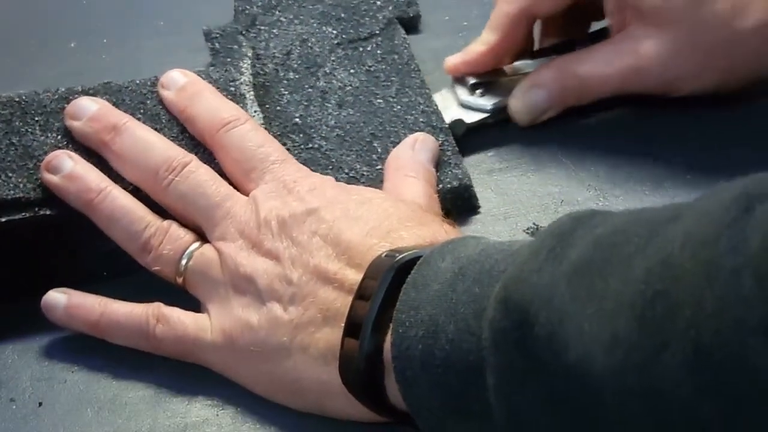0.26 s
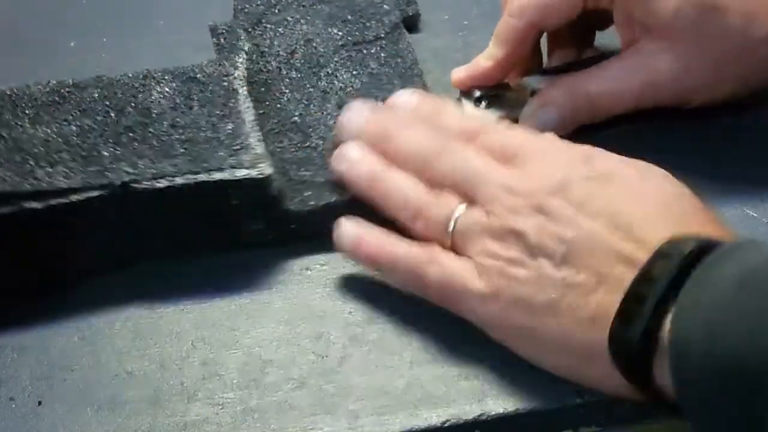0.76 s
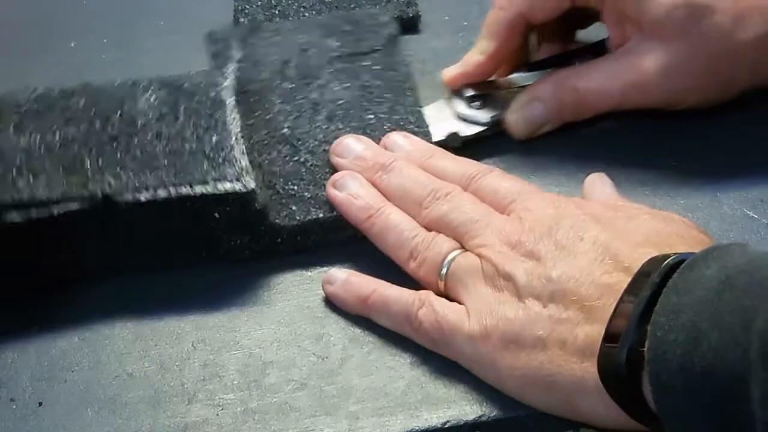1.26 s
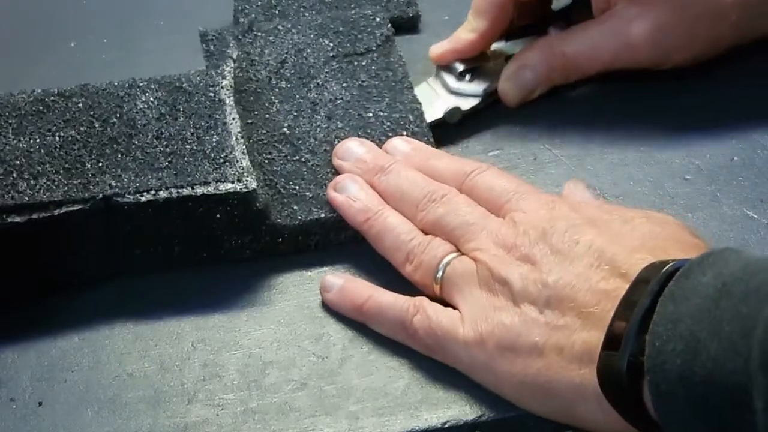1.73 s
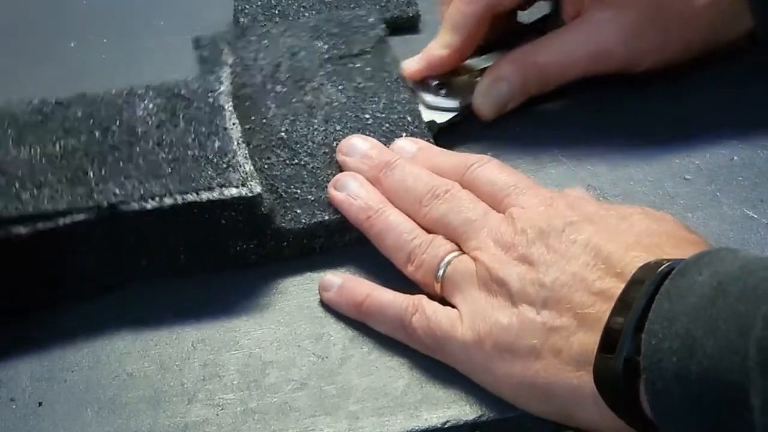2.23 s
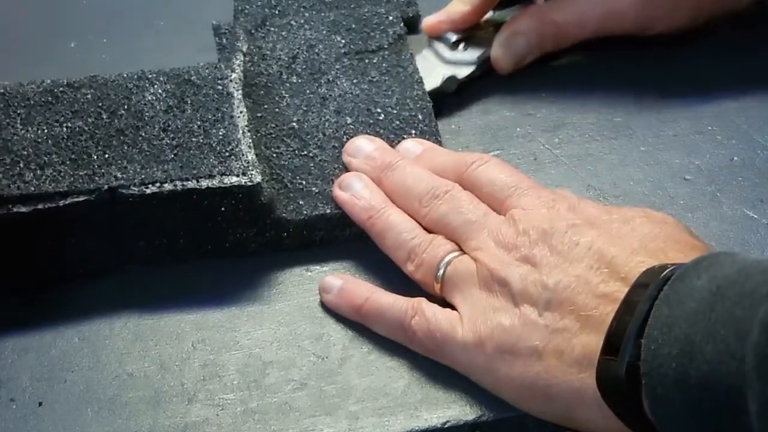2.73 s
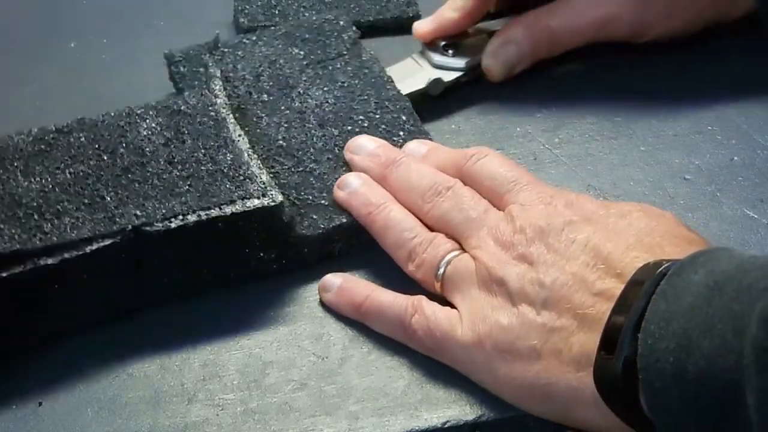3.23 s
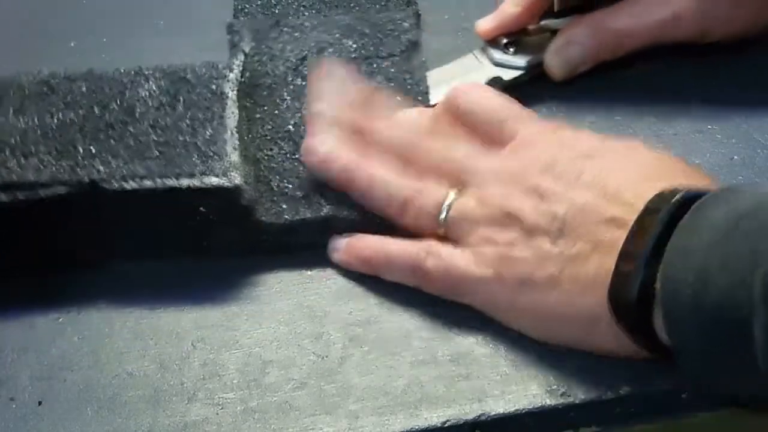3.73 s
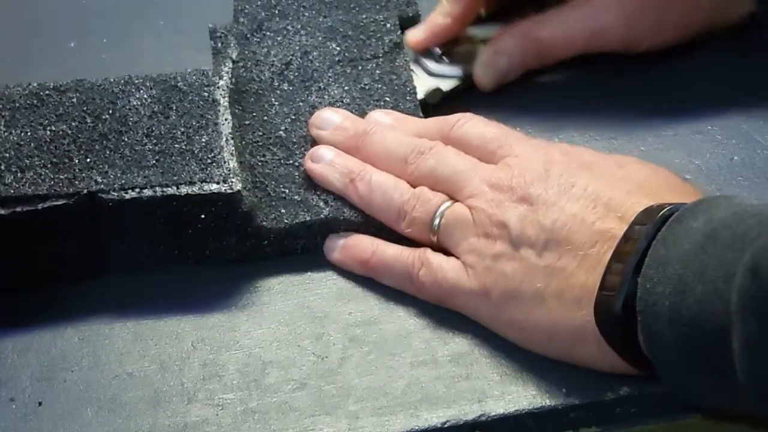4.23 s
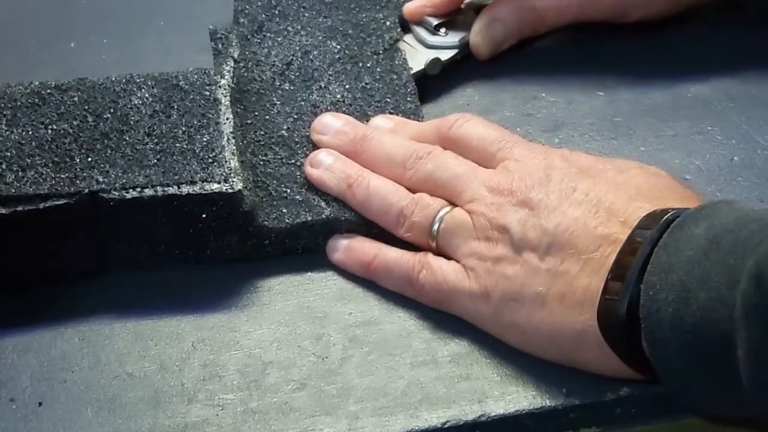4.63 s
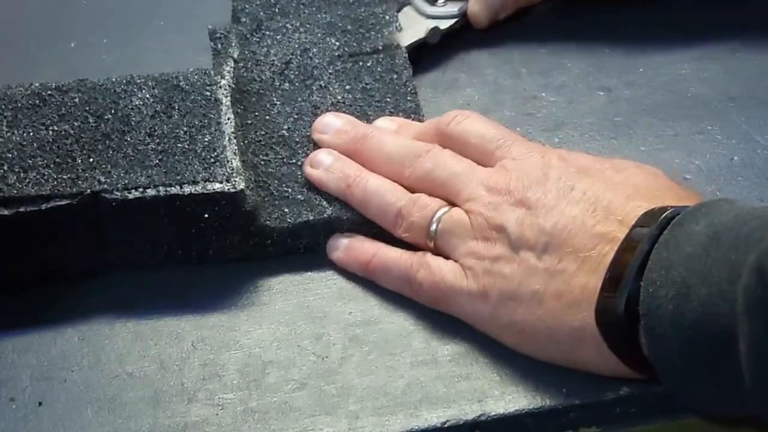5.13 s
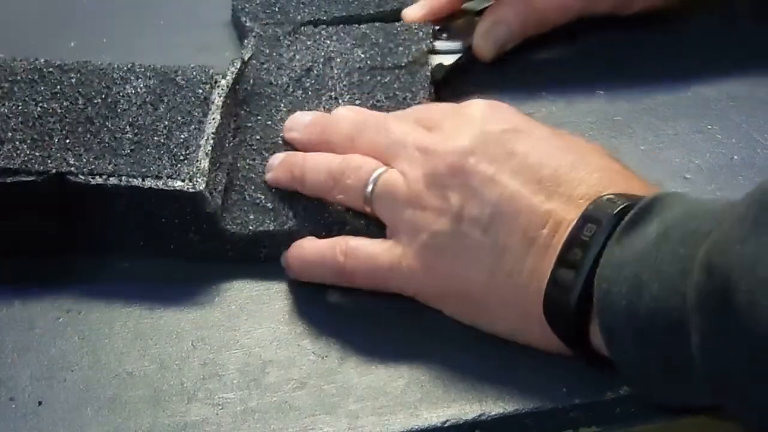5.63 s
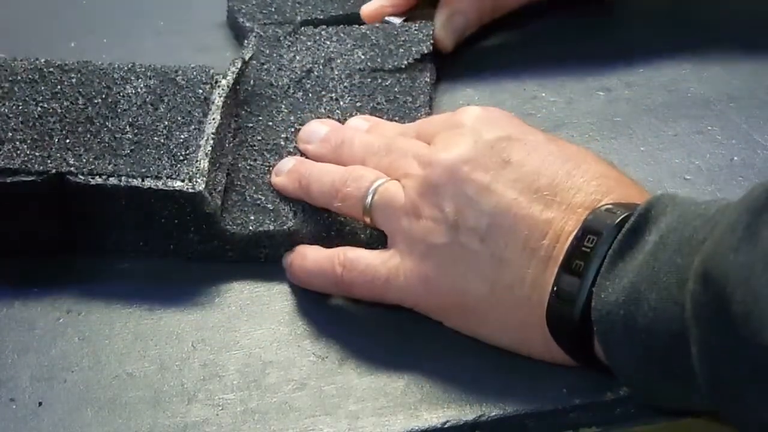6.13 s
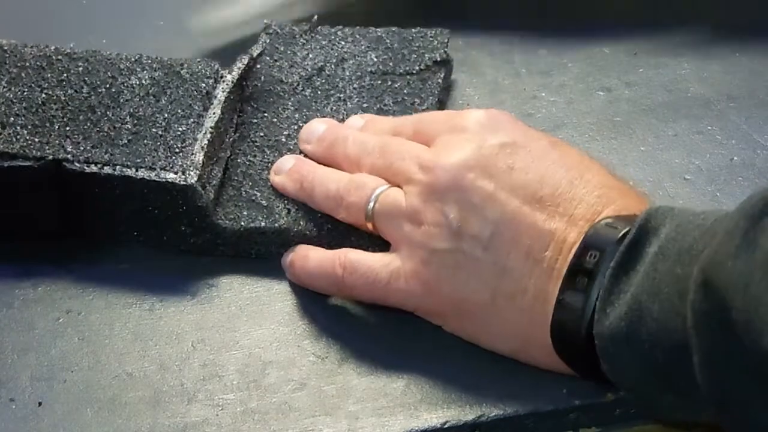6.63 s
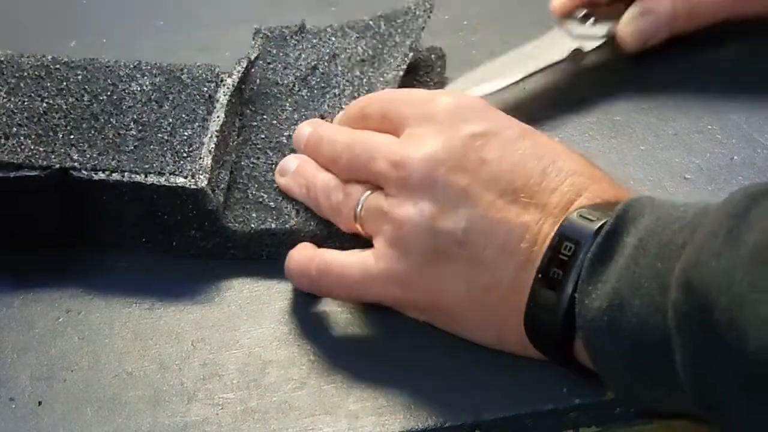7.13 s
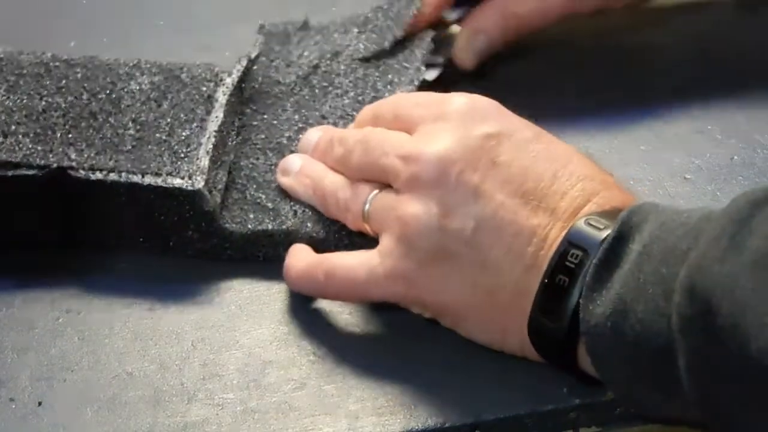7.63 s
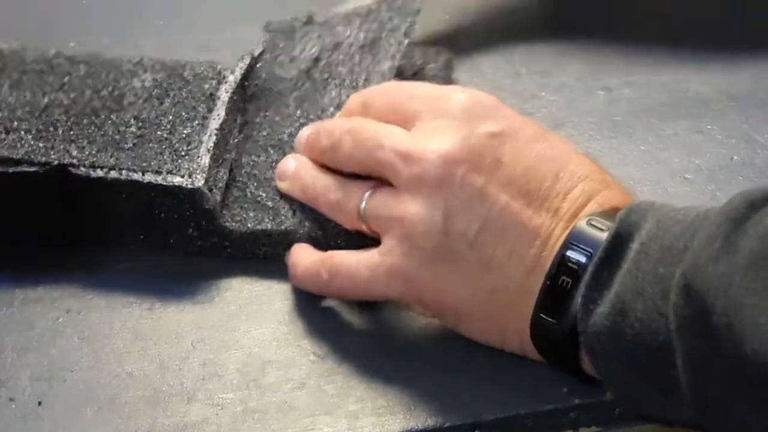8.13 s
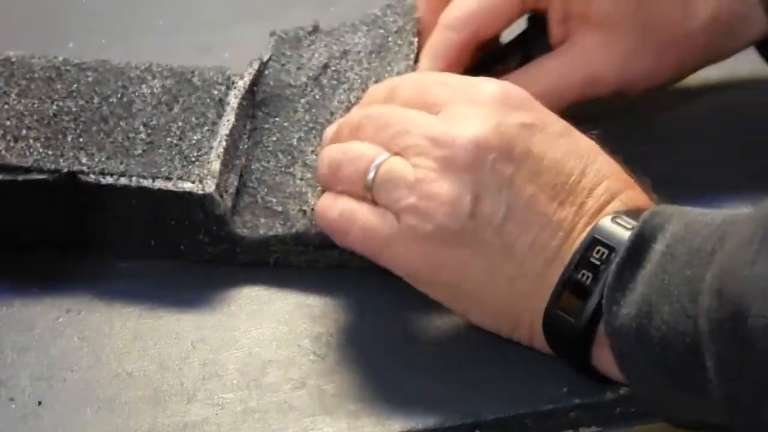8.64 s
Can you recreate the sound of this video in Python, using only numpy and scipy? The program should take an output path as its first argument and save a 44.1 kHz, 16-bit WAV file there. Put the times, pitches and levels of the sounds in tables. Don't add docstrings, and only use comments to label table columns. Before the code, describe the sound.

Dry, gritty tearing of foam under a blade, very near the microphone. Uneven strokes swell and fade with ticks and tiny snaps between them; sudden stick-slip rasps jump out and thump the slab softly. Late on, the knife knocks the hard bench in a tight cluster of bounces, then shorter strokes resume. Short bright room echoes follow, over faint hiss and a barely audible climbing motor hum.

```python
import sys
import numpy as np
from scipy import signal
from scipy.fft import rfft, irfft, next_fast_len
from scipy.io import wavfile
from scipy.ndimage import uniform_filter1d

SR = 44100
rng = np.random.default_rng(int(sys.argv[2]) if len(sys.argv) > 2 else 0)


def bounce(signal):
    frames = np.transpose(np.atleast_2d(signal))
    limited = np.clip(frames, -1, 1)
    pcm = np.round(limited * 32767).astype(np.int16)
    wavfile.write(sys.argv[1], SR, pcm)


def amplitude_ratio(level_db):
    exponent = np.asarray(level_db, float) / 20
    return 10 ** exponent


N = 391166

# pitch_hz, level_db
FOAM = [(35, -52), (60, -35), (142, -32), (217, -23.5), (427, -17.5), (515, -10), (635, -11.5), (840, -5.5),
        (901, -6.5), (1170, -8), (1820, -5), (2770, -5), (6270, -6.5), (8290, -2.5), (16000, -43.5)]
# pitch_hz, width_hz, level_db
SLAB = [(431, 21, -1), (502, 114, -1.5), (631, 120, -1), (1324, 680, -1)]
# low_hz, high_hz
VOICE_HZ = [(90, 250), (300, 750), (750, 1600), (1600, 5000), (5000, 12000)]
SPREAD_DB = -2
BAND_DRIFT_DB, BAND_FLICKER_DB, FLICKER_DB = 0.6, 1.2, 0.9


def knife():
    tear = crackle(rate=5000, scatter_db=5.0, hiss=0.7)
    rings = 0
    for hz, width, db in SLAB:
        rings = rings + amplitude_ratio(db) * signal.lfilter(*signal.iirpeak(hz, hz / width, SR), tear)
    tear = colour(tear + rings, FOAM)
    spread = colour(crackle(rate=4900, scatter_db=5.0, hiss=0.76), FOAM)
    spread = colour(spread, ROOM_SIDE) * amplitude_ratio(SPREAD_DB)

    f, density = signal.welch(tear, SR, nperseg=2 ** 12)
    at_rest = [density[(f > lo) & (f < hi)].sum() * f[1] for lo, hi in VOICE_HZ]
    log_gain = np.log(stroke_power() / np.c_[at_rest]) / 2
    centres = np.log(VOICE_HZ).mean(axis=1)
    out = 0
    for hz, band in bands(np.array([tear, spread])):
        share = [np.interp(np.log(hz), centres, one) for one in np.eye(len(VOICE_HZ))]
        change_db = BAND_DRIFT_DB * walk(9) + BAND_FLICKER_DB * walk(45)
        out = out + band * np.exp(share @ log_gain) * amplitude_ratio(change_db)
    return out * amplitude_ratio(FLICKER_DB * walk(35))


def crackle(rate, scatter_db, hiss):
    size_db = np.minimum(scatter_db * rng.exponential(size=N), 5)
    happens = rng.random(N) < rate / SR
    bursts = happens * amplitude_ratio(size_db) * rng.uniform(-1, 1, N)
    return unit(bursts) + hiss * rng.standard_normal(N)


BITE_MS, BITE_PER_LENGTH = 0.46, 0.076


def stroke_power():
    t = np.arange(N) / SR
    power = sawing_power()
    for at, gains, ms in slips() + snaps() + knocks() + thumps():
        i, length = int(at * SR), ms / 1000
        age = t[:min(int(5 * length * SR), N - i)]
        bite = BITE_MS / 1000 + BITE_PER_LENGTH * min(length, 0.012)
        shape = (1 - np.exp(-age / bite)) * np.exp(-(age / length) ** 2)
        power[:, i:i + len(age)] += np.outer(gains * amplitude_ratio(-11.0), shape) ** 2
    return power


# deepest_bite_s, rasp_db, swell_ms, fade_ms, weight_on_slab_db
STROKES = [(0.17, -40.5, 99, 356, 1.5), (0.632, -44.5, 118, 430, 0), (2.093, -34.5, 46, 97, 1),
           (2.292, -22.5, 22.4, 81, 0), (2.32, -29.5, 39, 152, 1.5), (3.23, -44, 56, 190, -10),
           (3.338, -41, 214, 115, 3.5), (3.733, -29, 38, 97, -1), (3.972, -28.5, 8.8, 23, 0),
           (4.003, -33, 22, 27, -2), (4.029, -27, 5.9, 18, -3.5), (4.034, -42, 160, 57, 3.5),
           (4.28, -37, 49, 74, 2.5), (4.764, -41.5, 83, 97, 3), (5.12, -27, 10.6, 145, -5),
           (5.46, -43, 156, 136, 1.5), (8.24, -53.5, 36, 170, 7), (5.742, -41.5, 83, 265, -6.5),
           (6.47, -50.5, 22, 170, 1), (6.842, -44.5, 8.1, 210, -9), (6.88, -31.5, 41, 130, -12),
           (6.934, -28.5, 67, 89, -1.5), (7.361, -49.5, 59, 92, 1.5), (8.61, -40.5, 37, 226, 4),
           (8.815, -42, 49, 260, 5),
           (0.0, -47.5, 59, 197, -1.5), (0.47, -51.5, 52, 60.6, -5), (0.955, -48.5, 21, 50, 2),
                 (1.456, -49, 21, 150, 2.5), (1.623, -50.5, 30, 237, 0.5), (1.585, -52, 20, 60, -10),
                 (2.03, -51.5, 110, 50, 1), (3.104, -46.5, 6.8, 90.5, -1), (3.459, -52.5, 15, 80, 2),
                 (3.531, -47, 41, 210, 1), (3.69, -51.5, 90, 50.3, -11), (3.92, -47, 21, 201, 6),
                 (4.7, -66, 12, 200, 0), (5.091, -48.5, 84, 30.2, 1), (6.336, -56, 5.4, 69.8, 0.5),
                 (6.45, -59, 140, 30, 2.5), (7.14, -48.5, 80, 109, -6), (7.305, -55.5, 29, 200, -6),
                 (7.55, -57, 63, 82.8, -1), (7.669, -53, 43, 170, 1.5), (8.042, -54, 62, 141, 8.5),
                 (8.322, -54, 290, 70.5, 5.5), (8.416, -49.5, 120, 89.5, 4.5), (8.55, -50.5, 150, 80, -1)]
# start_s, end_s, rasp_db, weight_on_slab_db
DRAGS = [(0.147, 0.35, -44, -2), (0.968, 1.18, -55, 2.5), (1.224, 1.465, -50.5, 2),
         (2.515, 2.577, -48.5, 3.5), (2.645, 2.841, -48.5, 2.5), (2.874, 3.004, -58.5, 1),
         (4.05, 4.214, -49, 3), (4.329, 4.467, -47.5, 3), (4.494, 4.616, -55.5, 3.5),
         (4.902, 5.008, -56.5, 3), (5.589, 5.92, -48, 0), (1.905, 1.95, -63, -5), (6.039, 6.16, -59.5, 5.5),
         (7.436, 7.65, -61, 3)]
DRAG_SWELL_MS, DRAG_FADE_MS, SAG_DB_PER_S = 24, 96, 12.5
REST_DB, FOOT = -81, 1.27
# thud_db, ring_db, fizz_db
STROKE_DB = (-18.5, -8, -4.5)
FADE_PACE = (.8, .85, .9, 1.01, 1.15)


def sawing_power():
    t = np.arange(N) / SR
    power = np.outer(voices(REST_DB, (-11, -3, 2), 0) ** 2, np.ones(N))
    sawing = [(at, at, db, swell, fade, weight) for at, db, swell, fade, weight in STROKES]
    sawing += [(start, end, db, DRAG_SWELL_MS, DRAG_FADE_MS, weight) for start, end, db, weight in DRAGS]
    for start, end, db, swell, fade, weight in sawing:
        swell, fade = max(swell, 6) / 1000, fade / 1000
        span = slice(max(int((start - 3 * swell) * SR), 0), int((end + 3 * fade) * SR))
        s = t[span]
        swell_db = 20 * (np.maximum(start - s, 0) / swell) ** FOOT
        sag_db = SAG_DB_PER_S * np.clip(s - start, 0, end - start)
        fade_db = 20 * np.maximum(s - end, 0) / fade + sag_db
        shape = amplitude_ratio(-swell_db - np.outer(FADE_PACE, fade_db))
        power[:, span] += (np.c_[voices(db - 2.5, STROKE_DB, weight)] * shape) ** 2
    return uniform_filter1d(power, size=256, axis=1) + 1e-14


# start_s, peak_db, weight_db, edge_db
TICKS = [(1.063, -36.5, 2, -6), (1.303, -33, 7, -12), (1.396, -42.5, 16.5, 6.5), (1.478, -41, 7, 8.5),
         (1.8332, -50.5, 6, 4.5), (1.9669, -49, 14, 8), (2.008, -42, 5, 11), (2.631, -34.5, 10, 0.5),
         (2.787, -43.5, 2, 10), (2.838, -48, 2, 11), (3.0944, -59.5, 1, -3), (3.4291, -39, -4, -2),
         (3.589, -32.5, 9, 5), (4.0544, -28, 2, -8), (4.4967, -31, 2, 0), (4.528, -36, 12, -2),
         (4.845, -49, -3, 8), (4.59, -36.5, -7, -8), (4.6912, -39, -3, 4), (5.768, -30.5, 5, 3.5),
         (5.806, -27.5, 2.5, -4), (6.3315, -54, 0, 11), (6.6827, -49.5, 8, -9), (6.8373, -44, -13, 11),
         (7.1767, -46.5, -6, 15), (7.668, -38, -4, -1), (8.161, -43, 3, 3.5), (8.2975, -35.5, 3, -10),
         (8.39, -43, 3, -2), (8.4093, -37, -3, -1), (3.479, -40, 0, -2), (1.366, -46, 0, 5),
         (1.131, -44.5, 11, 5), (8.5114, -44, 12, 0), (8.845, -32.5, 15, 3)]
CATCHES = [(0.9484, -33, -10, 2), (1.195, -29.5, 4, -1), (1.6261, -25.5, 3.5, -2.5), (2.269, -18, -8, -10),
           (2.277, -17, -6, -2), (3.458, -26.5, 1, -14), (3.5222, -25.5, -11, -5), (3.536, -24.5, 1.5, 0),
           (3.77, -21, -4, 3.5), (3.9315, -26, 6, 4), (5.1686, -16.5, 7, -11), (5.603, -30.5, 15.5, -1),
           (5.7285, -26.5, -1, 2), (5.724, -32, -4, -2), (5.735, -29, -4, -1), (5.793, -29.5, -5, 2),
           (6.461, -25, 0.5, -2.5), (8.584, -26, -9, 0), (8.5971, -15.5, 11.5, -1), (8.659, -27, 6, -7),
           (8.761, -29.5, 12.5, 3), (8.803, -19, 9.5, -20), (8.815, -25.5, -1, 7)]
TICK_MS, CATCH_MS = 13.8, 10.8
# start_s, peak_db, weight_db, edge_db, length_ms
RIPS = [(2.0433, -19, 4.5, 3, 23), (2.075, -25.5, 8, 1.5, 23), (2.287, -19, 5, -12, 8.2),
        (2.3194, -21, 8, -1, 20), (2.915, -41, 5, 8.5, 22), (3.713, -21, -2, 2, 36),
        (3.9076, -25.5, 4, 1.5, 11), (4.2625, -25.5, -5, -1, 14), (4.2824, -29, 6, -4, 29),
        (5.112, -12, 7.5, 1.5, 25), (5.138, -17, 7.5, 0.5, 24.6), (5.586, -26.5, 5.5, 0.5, 23),
        (8.225, -46, 12, 0, 48), (8.3184, -45, 18, 11, 11.4)]
# thud_db, ring_db, fizz_db
SLIP_DB = (-23.5, -18.5, -5)


def slips():
    events = [(*tick, TICK_MS) for tick in TICKS]
    events += [(*catch, CATCH_MS) for catch in CATCHES]
    events += RIPS
    return [(at, voices(db, SLIP_DB, weight, edge), ms) for at, db, weight, edge, ms in events]


# start_s, peak_db
SNAPS = [
    (2.0397, -22),
    (2.073, -16),
    (2.2605, -29),
    (4.285, -33),
    (4.691, -42),
    (5.1125, -13),
    (7.79, -20.5),
    (8.1645, -44),
]
SNAP_MS, SNAP_EDGE_DB = 2.6, -1


def snaps():
    return [(at, voices(db, SLIP_DB, 0, SNAP_EDGE_DB), SNAP_MS) for at, db in SNAPS]


# start_s, peak_db, weight_db, length_ms
KNOCKS = [
    (7.7587, -10, -8.5, 17.8),
    (7.7875, -14.5, -5, 29),
    (7.8, -18, 1.5, 27),
    (7.813, -28, 2, 8.9),
    (7.829, -28, 1, 9),
    (7.842, -22.5, 0.5, 18),
    (7.885, -39, 0, 22),
    (7.864, -33.5, 4, 43),
    (7.92, -40.5, 0.5, 50),
]
# thud_db, ring_db, fizz_db
KNOCK_DB = (1.5, 4, -18.5)
KNOCK_RASP_DB = 2.5


def knocks():
    return [(at, voices(db, KNOCK_DB, weight, rasp_db=KNOCK_RASP_DB), ms) for at, db, weight, ms in KNOCKS]


# start_s, peak_db, length_ms
THUMPS = [(1.628, -50, 47), (2.06, -52, 69), (2.29, -48, 47), (2.8, -62, 56), (3.72, -56, 50),
          (5.115, -60, 40), (5.59, -61, 30), (6.92, -51, 110), (8.1, -60, 410), (8.6, -52, 44),
          (8.76, -63, 60), (2.4, -52, 60), (3.76, -56, 45)]
# thud_db, ring_db, fizz_db
THUMP_DB = (-5.5, -20, -26)
THUMP_BOOM_DB, THUMP_RASP_DB = 2.5, -15


def thumps():
    return [(at, voices(db, THUMP_DB, 0, 0, THUMP_BOOM_DB, THUMP_RASP_DB), ms) for at, db, ms in THUMPS]


# thud_db, ring_db, fizz_db
PER_WEIGHT = (1, 1.1, 0.013)
BOOM_DB = -18.5


def voices(db, base_db, weight_db, edge_db=0, boom_db=BOOM_DB, rasp_db=0):
    thud, ring, fizz = np.array(base_db) + weight_db * np.array(PER_WEIGHT)
    return amplitude_ratio(db + np.array([thud + boom_db, thud, ring, rasp_db, fizz + edge_db]))


# start_s, end_s, pitch_hz, level_db
POCKET = [(3.715, 3.795, 510, 8), (3.99, 4.188, 1240, 8), (5.108, 5.33, 1275, 11), (5.74, 5.825, 1300, 11),
          (3.6, 3.9, 925, 2), (6.892, 6.994, 1390, 0.5), (2.79, 2.87, 452, 10), (6.478, 6.598, 1310, 1),
          (5.55, 5.85, 370, 0), (3.6, 4.0, 500, 2), (8.587, 8, 435, 3)]
# start_s, end_s, pitch_hz, level_db
GAPE = [(0.0, 0.05, 2460, 2), (0.95, 0.965, 2920, -5), (0.95, 1.02, 2700, -16), (1.39, 1.44, 1600, -14),
        (2.04, 2.18, 1930, -1), (2.07, 2.12, 3980, -0.5), (2.275, 2.36, 2840, -1), (2.28, 2.36, 1100, -1.5),
        (2.5, 2.78, 2000, -9), (3.26, 3.4, 2180, -5), (3.905, 3.99, 3880, 4), (4.0, 4.05, 4230, 0),
        (4.26, 4.46, 2200, 0), (4.74, 4.86, 1890, -4), (5.113, 5.135, 2930, -7), (5.14, 5.34, 1290, -3),
        (5.59, 5.62, 4300, 1), (1.24, 1.32, 3000, -4), (3.715, 3.8, 2790, -8.5), (3.72, 3.76, 4160, -9),
        (3.72, 3.76, 5750, -2), (5.113, 5.13, 3300, -10), (4.87, 5.05, 1610, -6), (3.53, 3.55, 3000, -3),
        (0.17, 0.25, 2800, -12), (8.598, 8.64, 600, 3), (1.6, 1.7, 334, 6), (5.73, 5.82, 4530, -3),
        (6.05, 6.2, 2500, -2), (6.9, 7.05, 2060, -1.5), (7.76, 7.786, 1280, 7), (7.79, 7.86, 1190, 0.5),
        (7.795, 7.83, 620, -5), (7.76, 8.0, 413, 5), (8.23, 8.29, 1280, -8), (8.3, 8.335, 2120, 3),
        (8.598, 8.69, 1460, -2), (8.598, 8.62, 2320, -9), (8.803, 8.815, 2150, -1), (8.803, 8.865, 1200, 4)]
POCKET_Q, GAPE_Q = 8.1, 5


def pocket(cut):
    out = cut.copy()
    for rows, q in ((POCKET, POCKET_Q), (GAPE, GAPE_Q)):
        for start, end, hz, db in rows:
            span = slice(int(start * SR), int(end * SR))
            sung = signal.lfilter(*signal.iirpeak(hz, q, SR), cut[:, span])
            out[:, span] += amplitude_ratio(db) * sung * signal.windows.tukey(sung.shape[1], 0.3)
    return out


# start_s, end_s, pitch_hz, share_taken_away_0_to_1
MUFFLE = [(7.75, 8.0, 2900, 0.34), (8.5, 7.4, 245, .7), (5.1, 5.3, 710, 0.6), (5.11, 5.3, 1740, 0.36),
          (8.58, 10, 180, 0.7), (2.03, 2.4, 320, .6), (4.1, 5.28, 70, .8), (2.12, 2.26, 4300, .4),
          (0.86, 1.06, 4800, 0.44), (6.4, 6.6, 440, 0.5), (3.7, 3.82, 1800, 0.45), (6.1, 7.75, 590, 0),
          (6.83, 7.05, 2500, 0.22), (1.6, 1.8, 130, .5)]
MUFFLE_Q = 3.9


def muffled(cut):
    out = cut.copy()
    for start, end, hz, share in MUFFLE:
        span = slice(int(start * SR), int(end * SR))
        held = signal.lfilter(*signal.iirpeak(hz, MUFFLE_Q, SR), out[:, span])
        out[:, span] -= share * held * signal.windows.tukey(held.shape[1], 0.2)
    return out


# start_s, peak_db
CLICKS = [(0.0071, -28.9), (0.0979, -40.3), (0.9499, -35.3), (1.0631, -39.0), (1.0678, -36.5),
          (1.0973, -41.3), (1.1965, -29.5), (1.3051, -34.5), (1.8359, -48.9), (1.906, -48.0),
          (1.9681, -41.2), (2.0095, -38.5), (2.0142, -35.7), (2.0408, -20.2), (2.0457, -18.7),
          (2.0736, -18.8), (2.2611, -29.0), (2.6597, -37.9), (2.8366, -36.4), (2.9878, -43.6),
          (3.4587, -33.4), (3.5855, -32.1), (3.768, -20.7), (3.9306, -21.8), (3.9352, -22.1),
          (3.9514, -27.8), (4.3037, -26.5), (4.528, -35.4), (4.6573, -46.2), (4.6927, -35.8),
          (4.6972, -35.6), (4.8454, -38.8), (5.753, -26.0), (5.795, -27.9), (6.4634, -21.6),
          (6.4679, -26.5), (6.7332, -54.7), (6.8388, -33.3), (7.5459, -45.0), (7.6693, -37.1),
          (8.4105, -35.4), (8.5908, -26.4), (8.6634, -25.4), (8.7626, -27.6)]
# start_s, peak_db
TEARS = [(0.1394, -30), (0.1474, -30), (0.1954, -23), (0.2094, -25), (0.2394, -30), (0.2644, -30),
         (0.2924, -32), (2.2752, -19), (2.2857, -16), (2.2934, -19), (2.3024, -15), (2.3204, -19),
         (2.3274, -18), (2.3324, -22), (2.3464, -20), (2.3714, -22), (3.7224, -19), (3.731, -19),
         (3.7394, -15), (3.7463, -20), (4.0284, -16), (5.0814, -38), (5.1504, -10), (5.1734, -22),
         (5.5892, -21), (6.9117, -20), (6.946, -18), (6.9554, -21), (7.7593, -18), (7.7629, -23),
         (7.7724, -17), (7.805, -13), (7.8417, -21), (8.5996, -23), (8.6028, -22), (8.8044, -27)]
# pitch_hz, level_db
CLICK = [(300, -29), (1500, -1), (3000, 0.5), (6000, 0), (8500, -3.5), (11000, -18), (16000, -49)]
CLICK_DB, CLICK_SIDE_DB, TEAR_DB = 1, 0, -6


def clicks():
    at, db = np.transpose(CLICKS + [(at, db + TEAR_DB) for at, db in TEARS])
    sign, place = rng.uniform(-1, 1, (len(at), 2)).T
    one_peak = abs(colour(np.eye(1, 64)[0], CLICK)).max()
    size = np.sign(sign) * amplitude_ratio(db + CLICK_DB) / one_peak
    spikes = np.zeros((2, N))
    spikes[:, (at * SR).astype(int)] = size, size * place * amplitude_ratio(CLICK_SIDE_DB)
    return np.array([colour(one, CLICK) for one in spikes])


# start_s, end_s, level_db
BRUSHES = [(0.0, 0.034, -52), (0.297, 0.373, -55), (0.38, 0.5, -61.5), (2.504, 2.6, -61),
           (2.81, 2.873, -67), (3.096, 3.145, -67), (3.93, 4.11, -54), (4.52, 4.55, -60), (4.7, 4.73, -65),
           (5.388, 5.498, -57), (5.85, 5.989, -56.5), (6.34, 6.447, -79), (6.5, 6.62, -75),
           (7.114, 7.222, -59), (7.296, 7.44, -66), (7.48, 7.598, -75), (8.07, 8.17, -68),
           (8.188, 8.304, -60), (8.295, 8.35, -56), (8.356, 8.42, -63), (8.41, 8.5, -63),
           (8.49, 8.597, -57), (8.62, 8.72, -57), (8.74, 8.803, -50.5), (8.81, 8.876, -51),
           (1.227, 1.316, -57), (1.41, 1.522, -64), (0.58, 0.76, -64)]
# pitch_hz, level_db
SKIN = [(2000, -16), (5500, -7), (8200, 2), (10000, -7.5), (13000, -23), (16000, -26)]


def fingers():
    hiss = np.array([unit(colour(rng.standard_normal(N), SKIN)) for _ in range(2)])
    return hiss * touches(BRUSHES) * amplitude_ratio(1.2 * walk(51)) * np.c_[[1, amplitude_ratio(-3)]]


# pitch_hz, fade_s
ROOM_T60 = [(100, 0.57), (1000, 0.4), (3000, 0.42), (8000, 0.28), (14000, 0.091)]
# pitch_hz, level_db
ROOM_SIDE = [(30, -19), (120, -24), (250, -28), (500, -15), (1000, -9), (2000, -5.5), (4000, -2.5),
             (8000, -1.5), (15000, -1.5)]
ROOM_DB = -7.5


def room():
    t = np.arange(int(0.7 * SR)) / SR
    echoes = 0
    for hz, band in bands(rng.standard_normal((2, len(t)))):
        tail = np.exp(-np.log(1000) * t / along(ROOM_T60, hz)) * (1 - np.exp(-t / 0.0091))
        tail = amplitude_ratio(ROOM_DB) * tail / np.linalg.norm(tail)
        echoes = echoes + band * tail * np.c_[[1, amplitude_ratio(along(ROOM_SIDE, hz) + 1.5)]]
    return echoes


# start_s, end_s, level_db
RUMBLE = [
    (8.5, 8.9, -80),
    (2.3, 2.5, -84),
    (8.02, 8.15, -86),
]
RUMBLE_HZ = 70


def rumble():
    low_band = signal.butter(2, [15, RUMBLE_HZ], "band", fs=SR, output="sos")
    return touches(RUMBLE) * unit(signal.sosfilt(low_band, rng.standard_normal(N)))


# time_s, pitch_hz, level_db
MOTOR = [(0.2, 78, -98), (1.15, 93, -91), (1.5, 97.7, -99), (1.85, 105, -84), (2.3, 108.3, -82),
         (2.55, 112.6, -77), (3.15, 115.5, -75), (3.6, 117.3, -79.5), (4.4, 122.5, -81.5),
         (4.7, 124.2, -87.5), (6.6, 127, -91.5), (7.05, 131, -85), (7.5, 134.5, -84.5), (7.9, 137, -95),
         (8.87, 139, -80)]


def motor():
    s, hz, db = np.transpose(MOTOR)
    t = np.arange(N) / SR
    pitch = np.interp(t, s, hz) + 0.395 * walk(3.63)
    phase = 2 * np.pi * np.cumsum(pitch) / SR
    return np.sqrt(2) * amplitude_ratio(np.interp(t, s, db) + 2.1 * walk(6.5)) * np.sin(phase)


# pitch_hz, level_db
AIR = [(12, -39), (20, 3), (70, -4), (138, -4), (182, -5), (228, -4), (318, -3.5), (1570, 0.5),
       (12400, -16.5), (16000, -25)]
AIR_DB = -67


def air():
    mid, side = (colour(rng.standard_normal(N), AIR) for _ in range(2))
    side = colour(side, ROOM_SIDE)
    return amplitude_ratio(AIR_DB - 3.0) / np.sqrt(np.mean(mid ** 2)) * np.array([mid + side, mid - side])


def touches(rows):
    touch = np.zeros(N)
    for start, end, db in rows:
        i, length = int(start * SR), int((end - start) * SR)
        touch[i:i + length] += amplitude_ratio(db) * signal.windows.tukey(length, 0.5)[:N - i]
    return touch


def along(table, hz):
    f, v = np.transpose(table)
    return np.interp(np.log(np.maximum(hz, 1)), np.log(f), v)


def colour(x, table):
    size = 2 ** 12
    cep = irfft(np.log(amplitude_ratio(along(table, np.fft.rfftfreq(size, 1 / SR)))))
    cep[1:size // 2] *= 2
    cep[size // 2 + 1:] = 0
    return signal.oaconvolve(x, irfft(np.exp(rfft(cep))))[:len(x)]


def unit(x):
    return x / np.sqrt(np.mean(x ** 2))


def walk(rate):
    k = int(SR / rate)
    return 1.16 * uniform_filter1d(np.repeat(rng.standard_normal(N // k + 1), k), k)[:N]


BAND_HZ = 113 * 2 ** np.arange(0, 7.5, 0.5)


def bands(x):
    size = next_fast_len(x.shape[-1])
    log_hz = np.log(np.fft.rfftfreq(size, 1 / SR) + 1)
    place = np.interp(log_hz, np.log(BAND_HZ), np.arange(len(BAND_HZ)))
    spectrum = rfft(x, size)
    for k, hz in enumerate(BAND_HZ):
        yield hz, irfft(spectrum * np.clip(1 - abs(place - k), 0, 1), size)[..., :x.shape[-1]]


def scene():
    cut = muffled(pocket(knife())) + clicks() + fingers()
    mid, side = cut + signal.oaconvolve(cut[:1], room(), axes=1)[:, :N]
    return np.array([mid + side, mid - side]) + rumble() + motor() + air()


def roll_off(x):
    return signal.sosfilt(signal.butter(12, 16100, fs=SR, output="sos"), x)


PEAK_ROUND, TOP_HZ = 0.29, 15760


def record(dry):
    rounded = PEAK_ROUND * np.tanh(dry / PEAK_ROUND)
    low_pass = signal.ellip(10, 0.2, 60, TOP_HZ, fs=SR, output="sos")
    return roll_off(signal.sosfilt(low_pass, rounded))


dry = scene()
out = record(dry)
bounce(out)
```